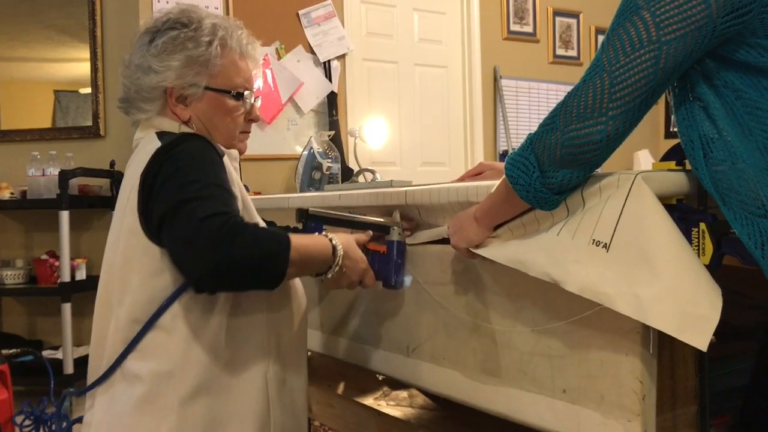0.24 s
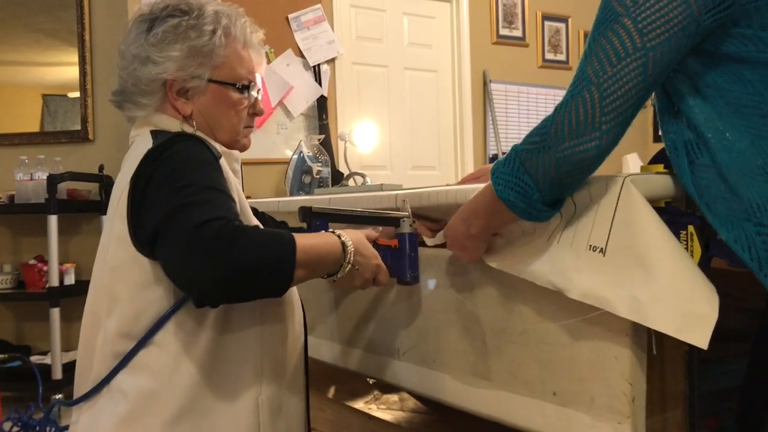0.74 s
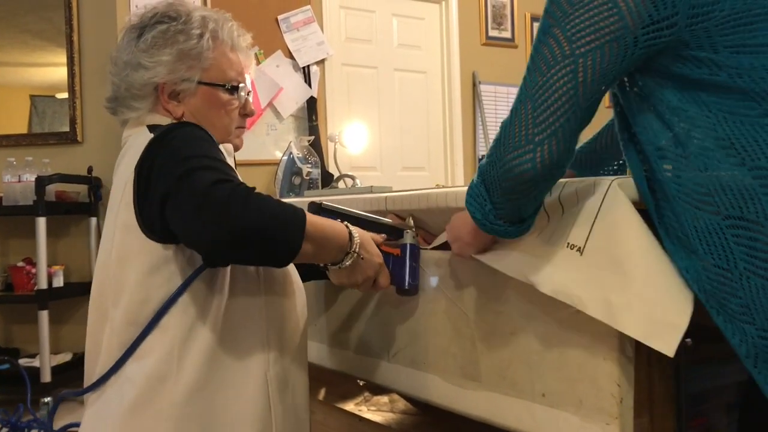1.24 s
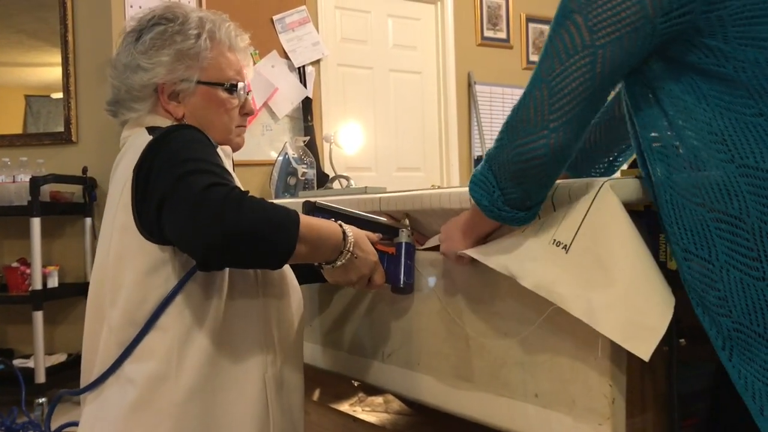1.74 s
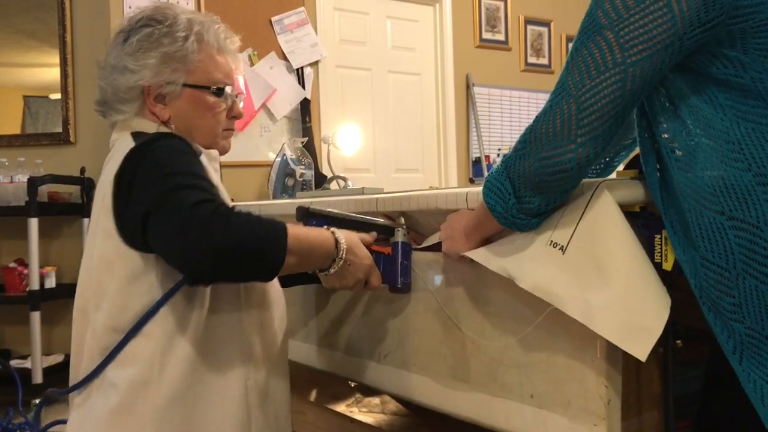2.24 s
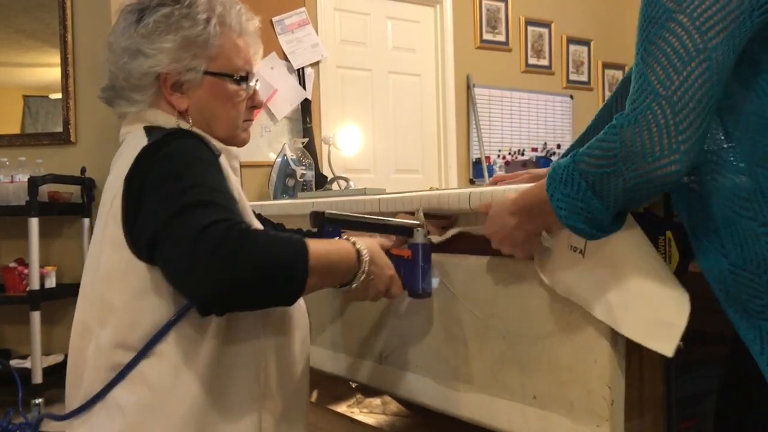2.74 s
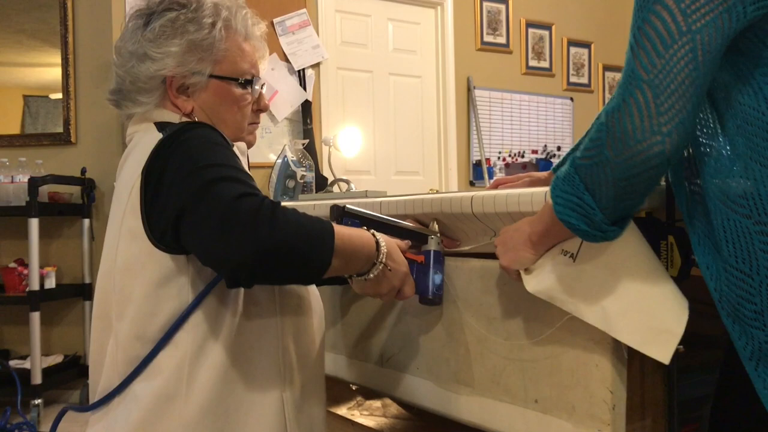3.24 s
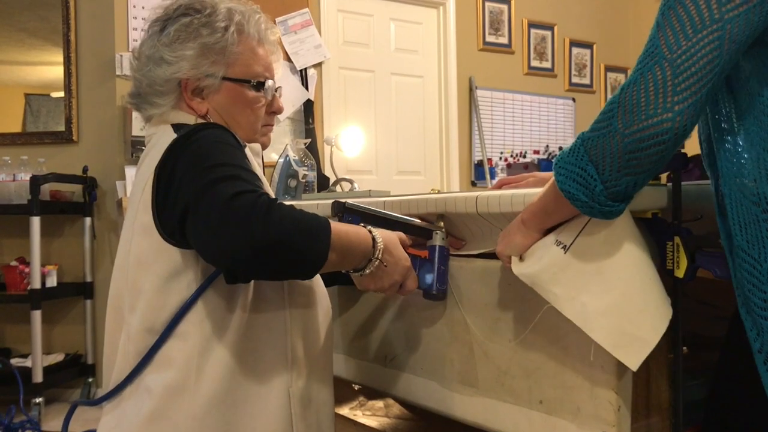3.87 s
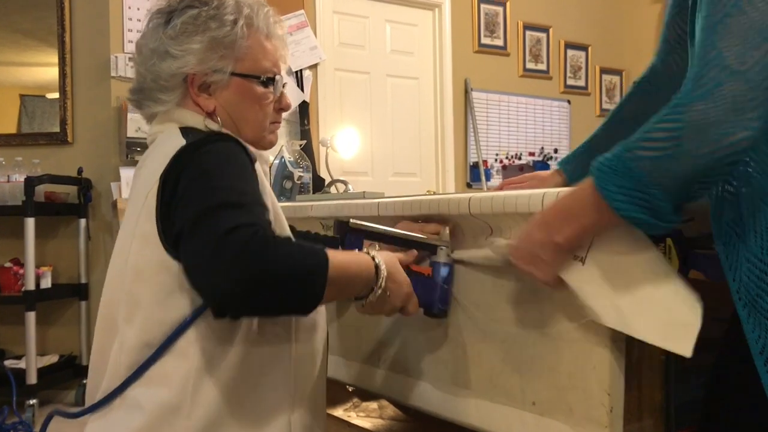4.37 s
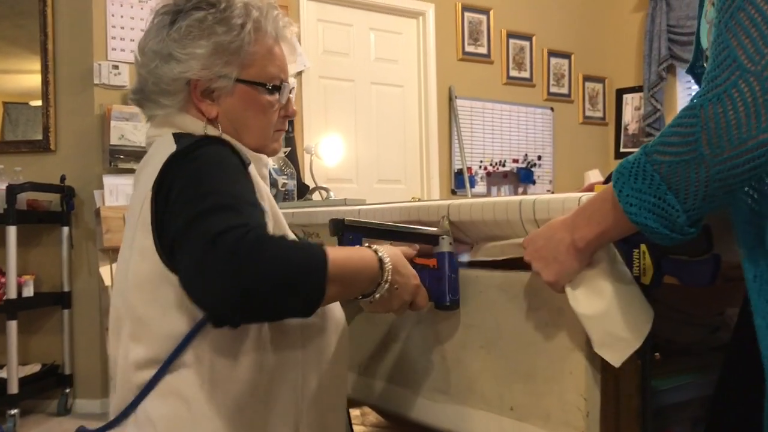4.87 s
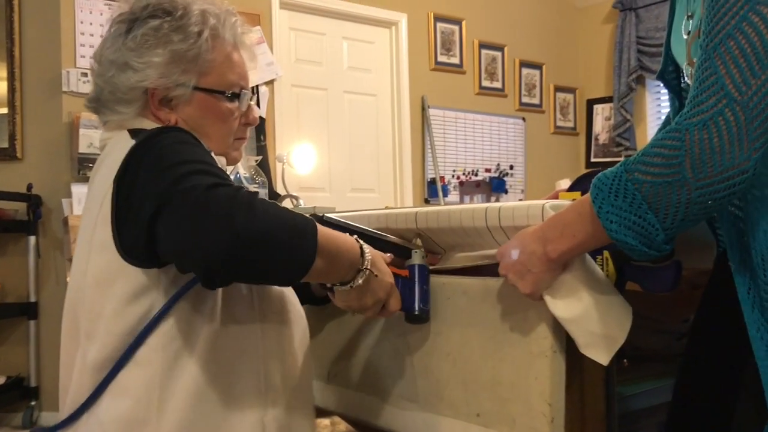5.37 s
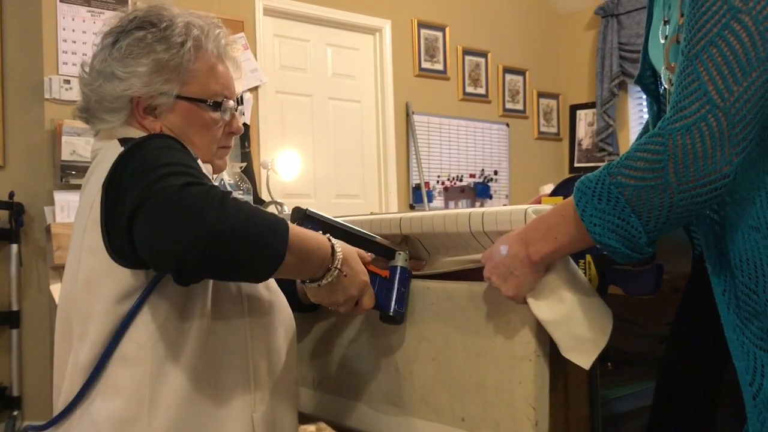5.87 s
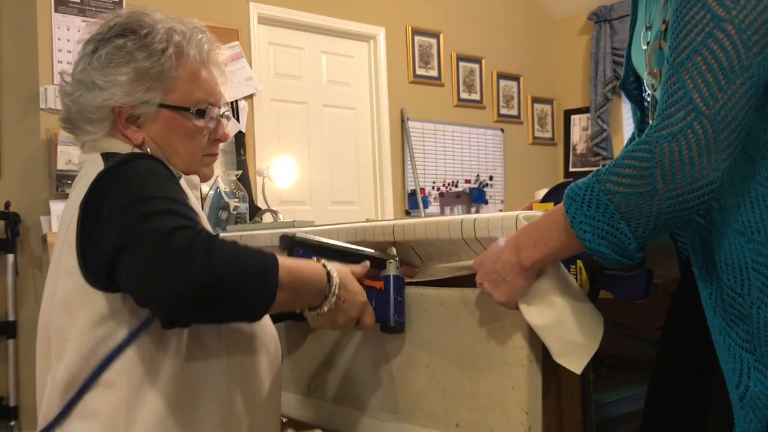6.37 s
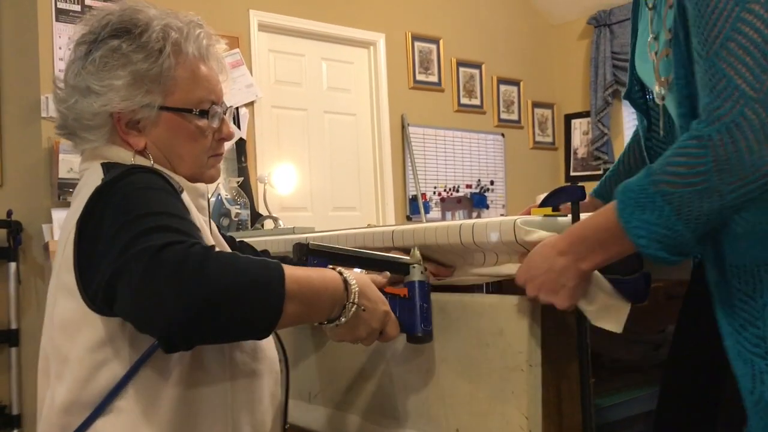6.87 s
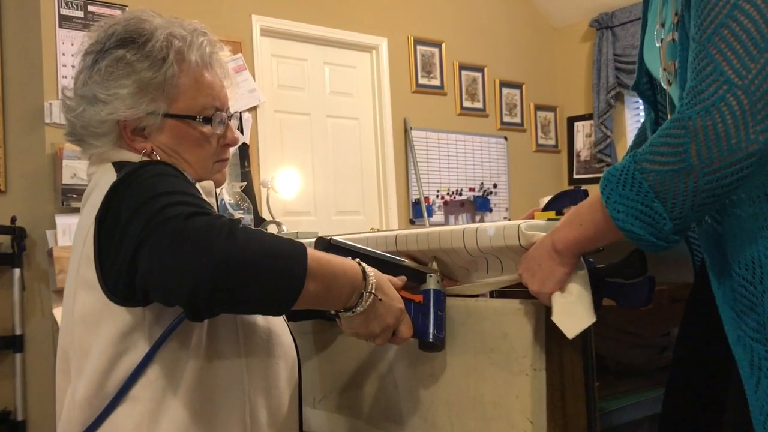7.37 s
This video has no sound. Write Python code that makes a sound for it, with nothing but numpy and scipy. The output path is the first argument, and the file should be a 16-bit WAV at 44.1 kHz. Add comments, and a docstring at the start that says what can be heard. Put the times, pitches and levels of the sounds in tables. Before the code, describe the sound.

An air stapler fastens fabric to a wooden furniture frame in a quiet indoor workroom, heard close in mono with short echoes and little deep bass. The first shot is already cracking at 0 seconds; at about 0.13 its air hisses out with dull thumps and a bright steel clack. Cloth rubs and slides softly from about 0.3 to 1.3, with small hollow bumps near 0.5, 0.7 and 1.2. The second shot cracks at 2.06, its vent and clack following at 2.28. Fabric rustles around 2.5, and a clearer hollow knock lands at 2.9. The third shot comes at 3.91, clacking back at 4.14, then more cloth and a faint bump at 4.6. After a quiet gap, the fourth bangs at 6.08 with a stronger woody ring, returning at 6.35. Soft rustling and several light knocks continue to about 7.3 over faint room air, hum and a wavering low drone.

```python
"""Four sharp shots of an air stapler, tacking fabric to a wooden furniture frame in a workroom.
In each, a blast of noise and ringing wood blows are followed, about a fifth of a second later, by a
hissing vent, dull thumps and a steel clack. The first shot begins just before time zero.
Between shots, filtered noise makes the cloth rub and hiss, and damped notes make the gun and hands bump.
Quiet room air, mains hum and a wavering drone run underneath; echoes place the stapler sounds in the room."""
import sys
import numpy as np
from scipy import signal
from scipy.io import wavfile

SR = 44100
rng = np.random.default_rng(int(sys.argv[2]) if len(sys.argv) > 2 else 0)


def store_wav(level_fs):
    """Save 16-bit WAV to argv[1]."""
    pcm = np.round(np.clip(np.atleast_2d(level_fs), -1, 1) * 32767)
    wavfile.write(sys.argv[1], SR, pcm.T.astype(np.int16))


N = 336483  # samples of finished sound

LEAD_S = .2  # worked out before time zero, then cut off
TIME = np.arange(N + round(LEAD_S * SR)) / SR - LEAD_S  # seconds
HIT_SIZE = np.sqrt(.03 * SR)  # a hit of 0 dB holds the energy of 30 ms at rms 1

# The driver hits the frame, and the gun kicks and lands again.
# Each row: start in seconds, level in dB, pitch of the struck spot in Hz, level of that spot in dB.
BLOWS = [(-.03, -14, 272, -23), (2.064, -16, 795, -26), (2.073, -17, 1900, -26), (2.086, -14.5, 755, -23),
         (2.099, -23.5, 2700, -23.5), (3.908, -19, 1000, -24), (3.918, -16, 2550, -27),
         (3.933, -19, 852, -25), (6.097, -13, 1257, -16.5), (6.101, -20, 1210, -16.5),
         (6.109, -21.5, 2556, -20.5)]
# The trigger lets air rush into the cylinder. Each row: start in seconds, length in seconds,
# level halfway through in dB, swell over the length in dB, how early the valve leaks in seconds.
BLASTS = [(-.035, 0.021, -17, -5, 0.0049), (2.061, 0.017, -13.5, -3.5, .003),
          (3.906, 0.012, -15.5, 2.5, .004), (6.073, 0.027, -15.5, 9, .014)]
# The trigger is let go and the piston travels home. Each row: start in seconds, travel in seconds,
# how early the valve leaks in seconds, vented air in dB, thump in dB, clack in dB,
# ring of the steel against the crack in dB, ping of the magazine in dB.
RETURNS = [(.126, 0.032, 0.0045, -22, -19.5, -21.5, -9.5, -47.5),
           (2.283, 0.023, 0.018, -21, -23.5, -19.5, -15, -40.5),
           (4.137, .029, .009, -21.5, -21, -19.5, -9.5, -45),
           (6.348, .022, 0.016, -21, -22.5, -19.5, -15, -48)]
# The cloth is pulled along or smoothed down. Each row: time it reaches full level in seconds,
# time it holds in seconds, rubbing in dB, sliding hiss in dB.
PULLS = [(.45, 0.1, -48, -58.5), (0.716, 0.069, -47, -56.5), (.85, 0.11, -48.5, -52.5),
         (1.246, 0.022, -59, -61), (2.483, .32, -49, -55.5), (2.898, .14, -54.5, -56),
         (3.122, 0.049, -57, -68), (4.368, .33, -48.5, -51.5), (4.873, 0.037, -59, -68.5),
         (6.538, 0.32, -48, -54), (7.0, .14, -64.5, -65.5), (7.471, .05, -66.5, -66)]
# Gun and hands bump the padded frame. Each row: start in seconds, level of the hollow note in dB,
# its pitch in Hz, its width in Hz, scuff of the cloth in dB.
KNOCKS = [(.467, -47, 390, 130, -43.5), (.686, -45.5, 455, 130, -43), (.728, -44, 448, 220, -39.5),
          (1.239, -46.5, 436, 99, -55), (2.903, -32.5, 446, 300, -52), (2.908, -34.5, 648, 323, -36),
          (4.629, -50.5, 613, 400, -52), (5.384, -61.5, 1017, 807, -63), (6.648, -47, 346, 90, -40.5),
          (6.811, -47, 446, 400, -43.5), (6.865, -48, 444, 90, -57), (6.985, -48.5, 490, 230, -53),
          (7.262, -62.5, 645, 400, -60)]

# Spectra of the noises and cracks. Each row: frequency in Hz, relative level in dB per Hz.
BLOW_COLOUR = [(100, -28.5), (220, -17.5), (350, -3), (520, -4.5), (760, 0), (1250, -0.5), (1600, 0.5),
               (2400, -2), (3500, -9.5), (5500, -10), (7500, -9.5), (10000, -25.5), (15000, -30)]
BLAST_COLOUR = [(150, -30.5), (600, -17.5), (1500, -5), (2800, -4.5), (4200, 4), (5600, -3), (7500, 2.5),
                (9500, -1.5), (12000, 0), (15000, -5.5)]
VENT_COLOUR = [(150, -8), (400, -3), (660, -5.5), (900, 7), (1500, 2.5), (2600, -3), (4200, -3),
               (7000, -1.5), (10000, -2), (15000, -5.5)]
THUMP_COLOUR = [(90, -15.5), (170, -9.5), (260, -9), (360, 2), (520, -3.5), (660, -11), (830, -0.5),
                (1220, -2), (1600, -10.5), (2400, -23), (4000, -17.5), (15000, -33)]
CLACK_COLOUR = [(110, -11), (250, 6.5), (450, -11.5), (660, 0.5), (900, -17.5), (1600, 4.5), (2500, -0.5),
                (3300, -3), (5500, -4), (8000, 0), (10500, -3), (15000, -5)]
CLOTH_COLOUR = [(100, -11), (250, -3.5), (400, -0.5), (650, -2), (1200, -2.5), (2000, -12.5), (3500, -20.5),
                (8000, -24.5), (15000, -38.5)]
SLIDE_COLOUR = [(200, -6.5), (1000, 0.5), (2000, 4), (4000, -2), (7000, -6), (10000, -9), (15000, -11)]
THUD_COLOUR = [(90, -18), (200, -16), (330, 3.5), (650, 5), (950, 0.5), (1300, -17), (1700, -8),
               (2500, -34), (6000, -36), (15000, -59)]
SCUFF_COLOUR = [(120, -21.5), (280, 2.5), (450, 3), (750, 0), (1000, -4), (1500, -12), (2500, -27),
                (6000, -32), (15000, -45)]
AIR_COLOUR = [(60, -25.5), (120, -14.5), (180, -19.5), (240, -7.5), (285, -16.5), (340, -13.5), (500, -15),
              (1000, -17.5), (2000, -23), (4000, -28), (11500, -35), (15500, -39.5)]

# Notes that ring in the wooden frame, the steel of the gun and its long steel magazine.
# Each row: pitch in Hz, relative level in dB, time to die by 60 dB in seconds.
WOOD = [(332, -3, 0.091), (726, -4, 0.066), (867, -1.5, 0.14), (1045, -2.5, 0.084), (1222, -0.5, 0.093),
        (1385, -18.5, .1), (1747, -10, .14), (1850, -8.5, 0.064), (2317, -9, 0.2), (2460, -12, .12),
        (2966, -9.5, .12)]
STEEL = [(890, -2, 0.17), (2660, -2, 0.23), (3860, -10, .35), (4730, -10.5, 0.18), (6850, -0.5, .08),
         (7200, -2.5, .06), (8020, 1, 0.042), (9700, 16, .12), (9836, -10, 0.34), (10050, 8, 0.14),
         (10690, -11, .12), (12310, -15, .08)]
MAGAZINE = [(1720, -2, .28), (3740, -2, .28), (3810, 0, .3), (3890, -2, .28)]
# How long the room echoes. Each row: frequency in Hz, time to die by 60 dB in seconds.
ROOM_T60 = [(120, 0.33), (300, 0.51), (900, 0.42), (2000, 0.44), (4500, 0.45), (8000, .38), (11000, 0.32),
            (15000, 0.26)]
# The low drone sinks in pitch. Each row: time in seconds, pitch in Hz before its wavering.
DRONE_PITCH = [(1.8, 255.7), (3, 238.8), (5.5, 228.9), (7.63, 221.3)]
# The drone swells and dies back. Each row: time of the peak in seconds, level added there in dB.
DRONE_SWELLS = [(1.2, -67), (6.9, -53)]

AIR_DB = -61.5
MAINS_HZ, MAINS_DB = 119.7, -72.5
DRONE_DB, DRONE_RISE_S, DRONE_FALL_S = -67.5, 0.14, 0.16
LEAK_DB, LEAK_S = -11.5, .005  # a valve spits as its seal breaks; level against the full jet
VENT_LEAD_S, VENT_S, VENT_SWELL_DB = .006, .038, -8  # the exhaust opens just before the driver pulls free
DROP_S, DROP_DB = .019, -1  # the gun drops back against the frame just after that
CLACK_REBOUND_S, CLACK_REBOUND_DB = .0045, -2  # the piston bounces once on its stop
PULL_ATTACK_S, PULL_RELEASE_DB_PER_S = 0.14, 70  # the hand takes up the slack; later the cloth settles


def amp(db):
    """Turns decibels into a multiplier for the wave."""
    return 10 ** (np.asarray(db) / 20)


def evened(x):
    """Scales a sound to an average (rms) level of 1."""
    return x / np.sqrt(np.mean(x ** 2) + 1e-20)


def unit(x):
    """Scales a sound to a total energy of 1."""
    return x / np.linalg.norm(x)


def read(points, hz):
    """Reads between the rows of a table, with frequency spaced as the ear hears it (log)."""
    table_hz, value = np.transpose(points)
    return np.interp(np.log(hz + 1), np.log(table_hz + 1), value)


def add(mix, start_s, sound):
    """Mixes a sound in at a given time."""
    part = mix[max(round((start_s + LEAD_S) * SR), 0):][:len(sound)]
    part += sound[:len(part)]


def click(colour, size=4096):
    """The most compact pulse with this spectrum that starts at once (minimum phase), of energy 1."""
    log_gain = np.log(amp(read(colour, abs(np.fft.fftfreq(size, 1 / SR)))))
    spectrum = np.exp(np.conj(signal.hilbert(log_gain)))
    return unit(np.fft.ifft(spectrum).real[:size // 2])


def tint(x, colour):
    """Filters a sound with a spectrum from a table."""
    return signal.oaconvolve(x, click(colour))[:len(x)]


def drift(per_s):
    """Smooth chance of rms 1: random points, two a cycle, joined by lines."""
    at = np.arange(TIME[0], TIME[-1], 1 / (2 * per_s))
    return evened(np.interp(TIME, at, rng.standard_normal(len(at))))


def ring(modes):
    """A struck body sounds as dying sines, each slightly off pitch in a new way at every blow."""
    t = np.arange(SR // 2, dtype=np.float32) / SR
    hz, db, t60 = np.array(modes, np.float32).T[:, :, None]
    hz = hz * rng.normal(1, 0.0046, hz.shape).astype(np.float32)
    fade = np.exp(-np.float32(np.log(1000)) * t / t60)  # down 60 dB after t60
    dying = fade * np.sin(2 * np.pi * hz * t)
    return unit((amp(db[:, 0]) * rng.choice([-1, 1], len(modes))) @ dying)


def hit(colour, modes, ring_db):
    """A blow makes a short crack and sets the struck body ringing."""
    sound, crack = amp(ring_db) * ring(modes), click(colour)
    sound[:len(crack)] += crack
    return HIT_SIZE * unit(sound)


def tock(hz, width_hz):
    """A heavily damped note that takes a moment to build up; a wider one dies faster."""
    t = np.arange(SR // 2) / SR
    return HIT_SIZE * unit(t * np.exp(-np.pi * width_hz * t) * np.sin(2 * np.pi * hz * t))


def room(x, direct_db, near_db, near_s, tail_db):
    """Sound arrives directly, by quick scatter off the frame and nearby bodies, and as the room's tail."""
    size = SR * 2 // 3
    t = np.arange(size) / SR
    # sparse echoes of either sign, about 12000 a second
    taps = rng.choice([-1., 1.], size) * (rng.random(size) < 12000 / SR)
    near = unit(rng.permutation(taps) * np.sqrt(t) * np.exp(-t / near_s))
    # each frequency of the tail dies at its own rate
    hz, at, bands = signal.stft(taps, SR, nperseg=256)
    decay = amp(-60 * at / read(ROOM_T60, hz)[:, None])
    tail = signal.istft(bands * decay, SR, nperseg=256)[1][:size]
    tail = unit(tail * (1 - np.exp(-t / 0.0051)))
    response = amp(near_db) * near + amp(tail_db) * tail
    response[0] += amp(direct_db)
    # energy 1 overall, so the settings only set the balance
    return signal.fftconvolve(x, unit(response))[:len(x)]


def still_air():
    """The air of the room is steady, coloured noise."""
    return amp(AIR_DB) * evened(tint(rng.standard_normal(len(TIME)), AIR_COLOUR))


def mains_hum():
    """Mains hum is one steady sine."""
    return np.sqrt(2) * amp(MAINS_DB) * np.sin(2 * np.pi * MAINS_HZ * TIME)  # root 2: level is rms


def drone():
    """A low sine sinks in pitch, wavers in pitch and level, and swells twice."""
    pitch = np.interp(TIME, *np.transpose(DRONE_PITCH)) * (1 + 0.014 * drift(8.7))
    level = amp(DRONE_DB)
    for s, db in DRONE_SWELLS:
        away = np.maximum((s - TIME) / DRONE_RISE_S, (TIME - s) / DRONE_FALL_S)
        level = level + amp(db) * np.exp(-away)
    level = level * amp(1.5 * drift(4.8))
    return np.sqrt(2) * level * np.sin(2 * np.pi * np.cumsum(pitch) / SR)


def jets(rows, colour, open_s):
    """Rushing air is fluttering noise; the valve spits first and takes a moment to open."""
    out = np.zeros(len(TIME))
    for s, length_s, db, swell_db, leak_s in rows:
        t = np.arange(round(length_s * SR)) / SR
        flow = amp(db + swell_db * (t / length_s - .5)) * (1 - np.exp(-t / open_s))
        spit = amp(db + LEAK_DB) * (t / LEAK_S * np.exp(1 - t / LEAK_S)) ** 2
        for at, level in (s, flow), (s - leak_s, spit):
            add(out, at, level * rng.standard_normal(len(t)))
    air = tint(out * amp(2.5 * drift(300)), colour)
    return room(air, direct_db=-1.5, near_db=0, near_s=0.012, tail_db=-1.0)


def trigger_blasts():
    """Pulling the trigger sends a jet of air into the cylinder."""
    return jets(BLASTS, BLAST_COLOUR, open_s=0.0012)


def driver_blows():
    """The driver and the kicking gun strike wood, which cracks, rings and gives a short note at the spot."""
    out = np.zeros(len(TIME))
    for s, db, spot_hz, spot_db in BLOWS:
        blow = hit(BLOW_COLOUR, WOOD, ring_db=-7.5)
        add(out, s, amp(db) * room(blow, direct_db=-14.5, near_db=-1.0, near_s=.006, tail_db=-1.5))
        spot = tock(spot_hz, width_hz=240)
        add(out, s, amp(spot_db) * room(spot, direct_db=0.5, near_db=-13.5, near_s=.005, tail_db=-7.5))
    return out


def exhaust_vents():
    """Letting the trigger go empties the cylinder in a jet that weakens."""
    vents = []
    for s, _, leak_s, air_db, *_ in RETURNS:
        vents.append((s - VENT_LEAD_S, VENT_S, air_db, VENT_SWELL_DB, leak_s))
    return jets(vents, VENT_COLOUR, open_s=.0025)


def piston_returns():
    """The driver pulls free and the gun drops, thumping wood; the piston clacks steel on its stop."""
    out = np.zeros(len(TIME))
    for s, travel_s, _, _, thump_db, clack_db, ring_db, ping_db in RETURNS:
        for at, db in (s, thump_db), (s + DROP_S, thump_db + DROP_DB):
            thump = hit(THUMP_COLOUR, WOOD, ring_db=-7.0)
            add(out, at, amp(db) * room(thump, direct_db=-9.5, near_db=5, near_s=0.0057, tail_db=-1.5))
        clack = amp(clack_db) * hit(CLACK_COLOUR, STEEL, ring_db)
        clack += amp(ping_db) * HIT_SIZE * ring(MAGAZINE)
        for later_s, db in (0, 0), (CLACK_REBOUND_S, CLACK_REBOUND_DB):
            landing = room(clack, direct_db=-20.5, near_db=1.0, near_s=0.0045, tail_db=-1.0)
            add(out, s + travel_s + later_s, amp(db) * landing)
    return out


def pull(s, length_s):
    """Power of one pull of the cloth over time: it grows, holds evenly and dies away."""
    attack = np.clip(1 + (TIME - s) / PULL_ATTACK_S, 0, 1)
    release = amp(-PULL_RELEASE_DB_PER_S * np.maximum(TIME - s - length_s, 0))
    return (attack * release) ** 2


def cloth():
    """Fabric rubs over the padding in small catches and hisses where it slides through the hand."""
    power = sum(amp(db)[:, None] ** 2 * pull(s, length_s) for s, length_s, *db in PULLS)
    rub_gain, slide_gain = np.sqrt(power)
    rub, slide = rng.standard_normal((2, len(TIME)))
    rub = evened(tint(rub * amp(2.2 * drift(40)), CLOTH_COLOUR))
    slide = evened(tint(slide * amp(1.6 * drift(400)), SLIDE_COLOUR))
    moving = rub_gain * rub + slide_gain * slide
    return room(moving, direct_db=6.0, near_db=-8.0, near_s=0.002, tail_db=-0.5)


def knocks():
    """A bump on the padded frame is a soft thud, one hollow note and a scuff of the cloth between."""
    out = np.zeros(len(TIME))
    u = np.arange(SR // 2) / SR / .011  # the scuff peaks after 11 ms
    for s, db, hz, width_hz, scuff_db in KNOCKS:
        thud = amp(db - 5) * hit(THUD_COLOUR, WOOD, ring_db=-25.5)
        note = amp(db) * tock(hz, width_hz)
        scuff = u * np.exp(1 - u) * tint(rng.standard_normal(len(u)), SCUFF_COLOUR)
        bump = thud + note + amp(scuff_db) * scuff
        add(out, s, room(bump, direct_db=-1.0, near_db=0.5, near_s=0.0041, tail_db=-4.0))
    return out


def scene():
    """The room, the stapler and the handling, in mono."""
    background = still_air() + mains_hum() + drone()
    stapler = trigger_blasts() + driver_blows() + exhaust_vents() + piston_returns()
    handling = cloth() + knocks()
    return (background + stapler + handling)[None, -N:]


def record(dry):
    """A steep bass cut, a soft overload on the loudest blows, and a limit to the treble."""
    bass_cut = signal.butter(N=14, Wn=110, btype="high", fs=SR, output="sos")  # Hz
    thin = signal.sosfilt(bass_cut, dry)
    ceiling = 1.1  # peaks bend towards this level
    pressed = thin / (1 + abs(thin / ceiling) ** 3) ** (1 / 3)
    treble_limit = signal.firwin(401, 15550, window=("kaiser", 8), fs=SR)  # Hz
    return signal.oaconvolve(pressed, treble_limit[None], "same")


dry = scene()
out = record(dry)
store_wav(out)
```